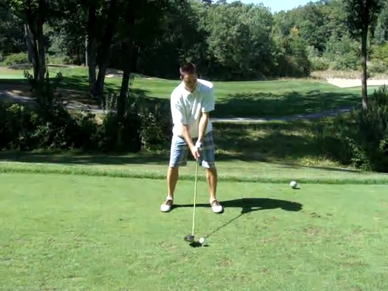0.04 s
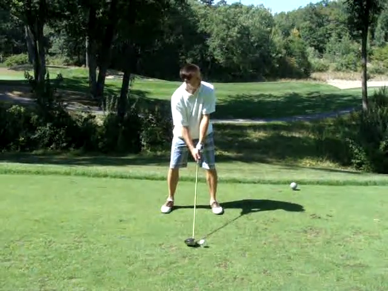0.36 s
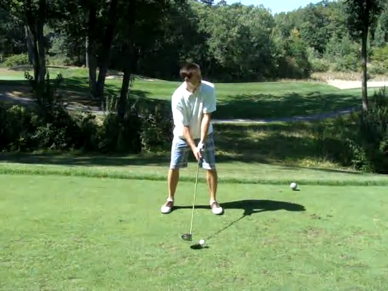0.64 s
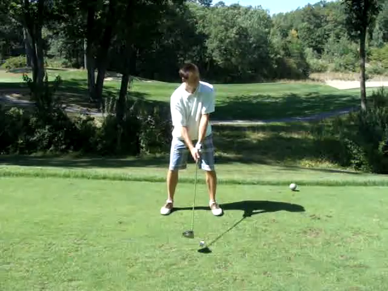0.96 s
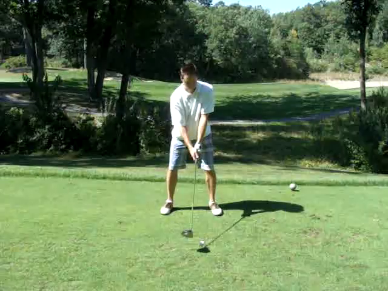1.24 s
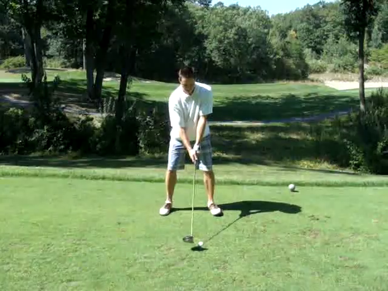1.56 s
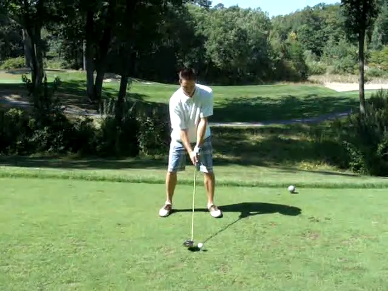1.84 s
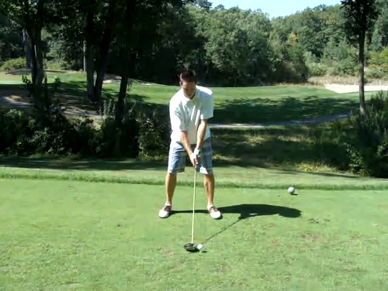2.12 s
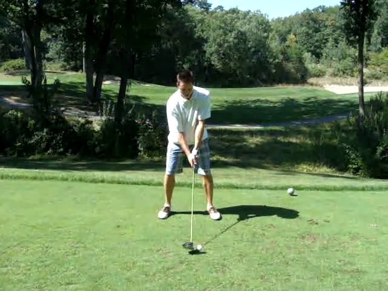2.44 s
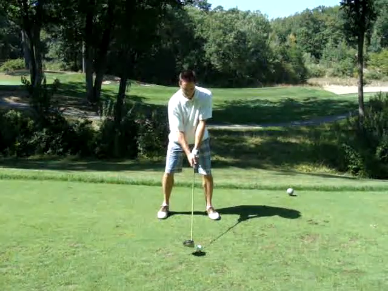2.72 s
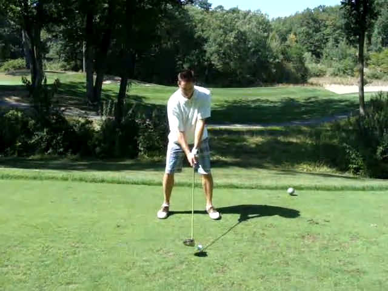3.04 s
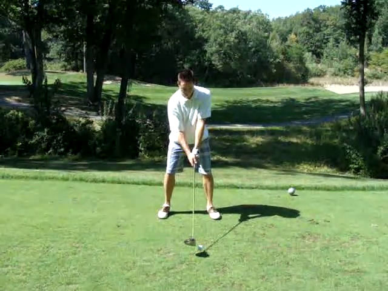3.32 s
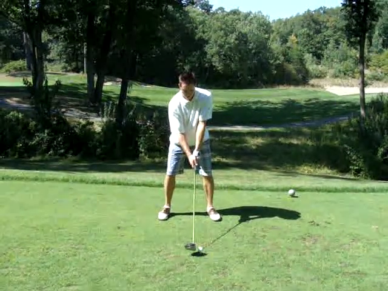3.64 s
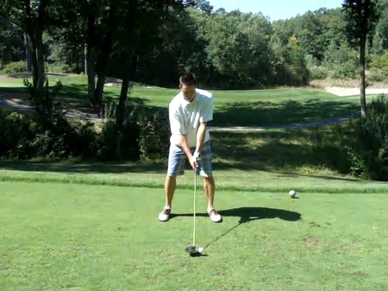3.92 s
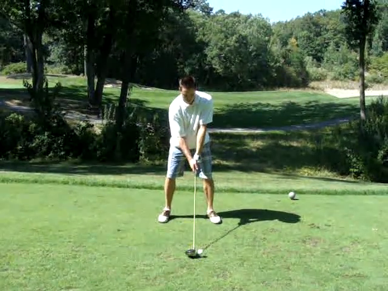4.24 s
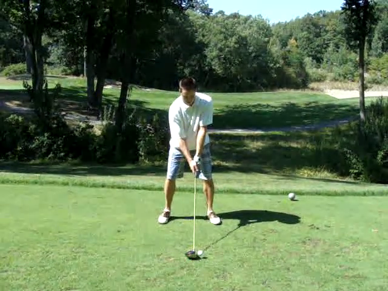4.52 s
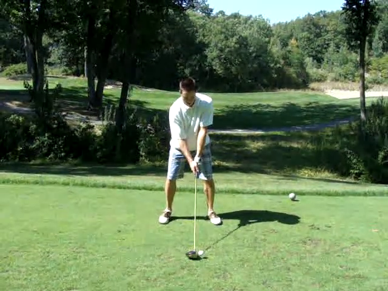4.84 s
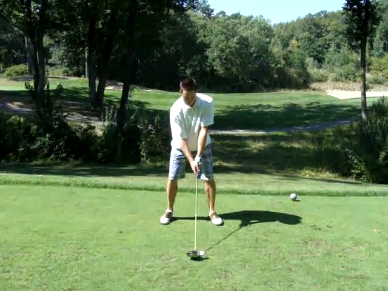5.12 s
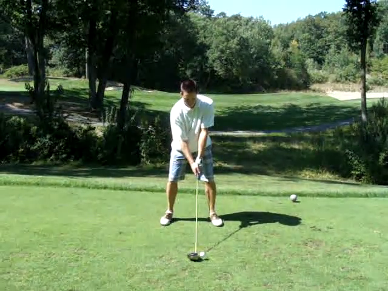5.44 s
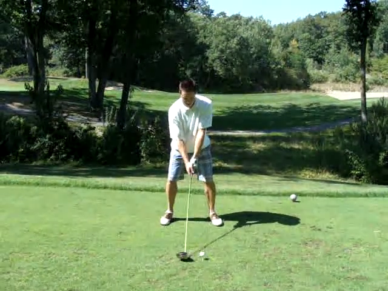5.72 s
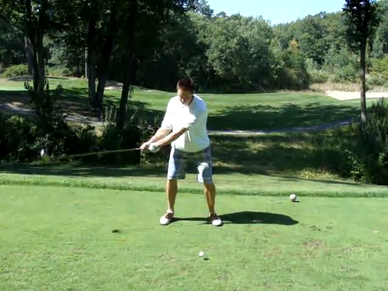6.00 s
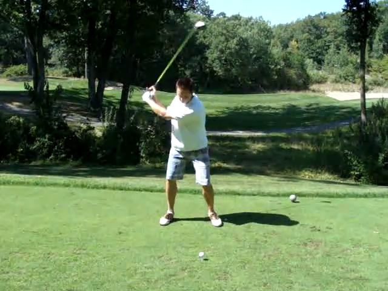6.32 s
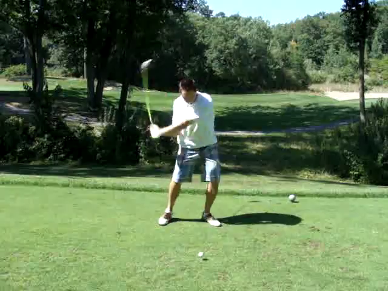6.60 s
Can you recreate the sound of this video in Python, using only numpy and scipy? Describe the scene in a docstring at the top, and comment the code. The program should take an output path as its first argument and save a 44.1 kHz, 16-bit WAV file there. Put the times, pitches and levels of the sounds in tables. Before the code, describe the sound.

A golf tee faces a wall of trees, heard from a few metres in front of the player. For several seconds there is only a quiet background of high, pulsing insects, leaf hiss, distant traffic and the odd bird peep. A tiny tick precedes a quick swish and the hard crack of a metal club head on the ball. Its ring dips in pitch and echoes back higher and blurred, leaving the insects again.

```python
"""On a still day, katydids rasp over far wind and traffic, leaves hiss and distant birds peep.
Near 5.9 s a faint tick comes as a golfer starts the backswing. Then the club's shaft whistles down
through the air. At 6.76 s the hollow metal head cracks on the ball, and the microphone's limiter
flattens the blow. The head rings, its pitch sinking as it swings away, and a wall of trees
facing the tee sends the ring back higher and smeared."""
import sys
import numpy as np
from scipy import signal
from scipy.fft import rfft, irfft, next_fast_len
from scipy.io import wavfile

SR = 44100
rng = np.random.default_rng(int(sys.argv[2]) if len(sys.argv) > 2 else 0)


def store_wav(level_fs):
    """Save 16-bit WAV to argv[1]."""
    pcm = np.round(np.clip(np.atleast_2d(level_fs), -1, 1) * 32767)
    wavfile.write(sys.argv[1], SR, pcm.T.astype(np.int16))


N = 337806
TIME = np.arange(N) / SR
FFT_SIZE = next_fast_len(N)
FREQS = np.maximum(np.arange(FFT_SIZE // 2 + 1) * SR / FFT_SIZE, 1)
IMPACT_S = 6.7601


def from_db(db):
    """Turn decibels into a gain to multiply by."""
    return 10 ** (np.asarray(db) / 20)


def unit_power(x):
    """Scale a signal so that its average power is 1."""
    return x / np.sqrt(np.mean(x ** 2) + 1e-20)


def colour(points):
    """A gain for every frequency, drawn through (f/Hz, level/dB) points."""
    hz, db = np.transpose(points)
    return from_db(np.interp(np.log(FREQS), np.log(hz), db))


def hump(hz, width_hz):
    """A gain that peaks at one frequency and falls away on both sides."""
    return 1 / (1 + ((FREQS - hz) / (.78 * width_hz)) ** 2)


def noise(gain):
    """Noise of power 1, shaped by a gain for each frequency; a hump at 0 Hz gives a random wobble."""
    return unit_power(irfft(rfft(rng.standard_normal(FFT_SIZE)) * gain, FFT_SIZE)[:N])


def band(x, low_hz, high_hz, order=2):
    """Let through what lies between two frequencies."""
    return signal.sosfilt(signal.butter(order, [low_hz, high_hz], "band", fs=SR, output="sos"), x + 1e-18)


def dying(start, t60):
    """A gain that jumps to 1, then fades by 60 dB every t60 seconds."""
    return (TIME >= start) * from_db(-60 * np.clip((TIME - start) / t60, 0, 4))


# the tone of the open air, from bass to treble: f/Hz, relative level/dB
AIR_TONE = [(20, -10), (45, -5.5), (70, 1.5), (160, 2), (260, -1), (700, -1), (1100, -7), (2200, -10),
            (4000, -13), (5000, -12.5), (5700, -17.5), (7000, -20.5), (8300, -14), (10000, -37)]
def open_air(murmur_db=-47, growth_db_per_s=0.29, waver_db=.5, leaves_db=-49):
    """Far wind and traffic make a low murmur that slowly grows; above it the leaves hiss evenly."""
    low_share = 1 / (1 + (FREQS / 1200) ** 8)
    level_db = murmur_db + growth_db_per_s * TIME + waver_db * noise(hump(0, 6.2))
    murmur = from_db(level_db) * noise(colour(AIR_TONE) * np.sqrt(low_share))
    hiss = from_db(leaves_db) * noise(colour(AIR_TONE) * np.sqrt(1 - low_share))
    return murmur + hiss


# hums in the distance: f/Hz, width/Hz, level/dB
FAR_HUMS = [(184.7, 9.8, -59), (509.4, 9.4, -63), (693, 62, -61), (1590, 53, -61.5), (1860, 38, -64.5)]
def hums():
    """Each far hum is a band of noise so narrow that it sounds like a wavering note."""
    return sum(from_db(db) * noise(hump(hz, width_hz)) for hz, width_hz, db in FAR_HUMS)


# one katydid a row: f/Hz, width/Hz, wing strokes/(1/s), relative level/dB
SINGERS = [(7725, 370, 16.4, -53.5), (8340, 1000, 20, -55), (8400, 190, 16, -53.5), (8825, 220, 16, -58)]
# how the whole chorus swells and sinks around its average: t/s, relative level/dB
CHORUS_SWELL = [(0.0, -50.5), (2.32, -50), (3.79, -52.5), (4.69, -51), (5.33, -51), (6.6, -50.5)]
def katydids(unsteady=0.1395, uneven=0.63, throb_db=4, chorus_db=-2):
    """Each wing stroke is a pulse of narrow rasping noise, no two equally strong."""
    swell_db = np.interp(TIME, *np.transpose(CHORUS_SWELL))
    chorus = np.zeros(N)
    for hz, width_hz, rate, db in SINGERS:
        stroke_rate = rate * (1 + unsteady * noise(hump(0, 1.83)))
        stroke = np.sin(2 * np.pi * np.cumsum(stroke_rate) / SR)
        depth_db = throb_db * (1 + uneven * noise(hump(0, 11)))
        chorus += from_db(db) * unit_power(noise(hump(hz, width_hz)) * from_db(depth_db * stroke))
    return from_db(chorus_db + swell_db - swell_db.mean()) * chorus


# distant bird calls: middle t/s, f/Hz, level/dB, half length/s
BIRD_PEEPS = [(0.322, 2480, -47, 0.012), (.39, 2500, -54, 0.034), (1.347, 2480, -54, 0.017),
              (2.082, 2420, -49, 0.012), (2.39, 1620, -56, .025), (4.902, 1600, -53, .03),
              (5.288, 5740, -58.5, .04)]
def birds(blur_hz=90):
    """Short peeps, blurred by the woods."""
    return sum(from_db(db) * np.exp(-((TIME - s) / half_length) ** 2) * noise(hump(hz, blur_hz))
               for s, hz, db, half_length in BIRD_PEEPS)


# a faint tick as the backswing starts: t/s, f/Hz, level/dB, time to fade 60 dB/s
BACKSWING_TICK = [(5.878, 4000, -35, 0.014)]
def tick(cycles=30):
    """A small sound nearby: the shorter it is, the wider its spread of pitch."""
    return sum(from_db(db) * dying(s, t60) * noise(hump(hz, cycles / t60))
               for s, hz, db, t60 in BACKSWING_TICK)


def scatter(delay, tree_line_s=0.12):
    """How strong the small echoes are at each delay: first turf, then the tree line, then deep woods."""
    beyond = delay - tree_line_s
    # each part is a level in dB, less a slope in dB per second
    turf = from_db(-18.5 - 19 * delay)
    tree_line = from_db(-3 - np.maximum(-125 * beyond, 242 * beyond))
    woods = from_db(-11 - 38.5 * beyond) * (beyond > 0)
    return np.sqrt(turf ** 2 + tree_line ** 2 + woods ** 2)


# echoes off single trunks: delay t/s, relative level/dB
TRUNK_ECHOES = [(.0848, -18.5), (.13, -26), (.1405, -28), (.181, -24)]
# how well the leaves send back each pitch: f/Hz, level/dB
LEAF_TONE = [(100, -14), (300, -13), (650, -6.5), (2000, 2.5), (2800, 0.5), (3600, -3), (4400, 2),
             (4900, -1), (5800, -4), (6500, 2.5), (7200, -3.5), (8500, -7.5), (10000, -10.5)]
def trees(sound, with_trunks=False, earliest_s=0, treble_loss_db=68, dull_hz=2100):
    """Countless small echoes smear a sound; the longer the path, the more treble the air takes."""
    delay = TIME[:SR]
    echo = scatter(delay) * rng.standard_normal(SR) / np.sqrt(SR) * (delay >= earliest_s)
    if with_trunks:
        for s, db in TRUNK_ECHOES:
            echo[int(s * SR)] += from_db(db)
    dull = signal.sosfilt(signal.butter(2, dull_hz, fs=SR, output="sos"), echo)
    bright_share = from_db(-treble_loss_db * delay ** 2)
    echo = bright_share * echo + (1 - bright_share) * dull
    returned = signal.fftconvolve(sound, echo)[:N]
    return irfft(rfft(returned, FFT_SIZE) * colour(LEAF_TONE), FFT_SIZE)[:N]


def swoosh(fastest_s=6.732, top_hz=969.3, onset_hz=520, waver=0.0855, flutter_db=3.5):
    """Swirls of air peel off the shaft and whistle higher with speed; the head drags rushing air along."""
    # in octaves below top speed: the club speeds up, holds, loses some speed to the ball, then slows
    downswing = 17.5 * np.maximum(fastest_s - TIME, 0)
    follow_through = (TIME > IMPACT_S) * (.42 + 8.2 * (TIME - IMPACT_S))
    octaves = -np.minimum(downswing + follow_through, 10)
    pitch = top_hz * 2 ** octaves
    whistle_db, rush_db = -11.5 + 25 * octaves, -21.5 + 48 * octaves
    swirling = 1 / (1 + (onset_hz / pitch) ** 20)  # a slow shaft hardly makes regular swirls
    whistle = 0
    # near full speed the shaft's slower middle adds a lower note, growing with the rush
    for share, db in [(1, whistle_db), (.72, rush_db + 6.5)]:
        phase = 2 * np.pi * np.cumsum(share * pitch * (1 + waver * noise(hump(0, 250)))) / SR
        whistle += np.sin(phase) * from_db(db + flutter_db * noise(hump(0, 170)))
    rush = noise(colour([(40, -35), (150, 12.5), (350, 4.5), (800, 10), (1400, 10), (2800, 8.5),
                         (4200, -8), (6000, -3.5), (9500, -23)]))
    return swirling * whistle + from_db(rush_db) * rush


def thud(bump_db=-18, bump_t60=0.19, knock_db=-4, knock_t60=0.029):
    """The ball's short low knock, and a deep bump under the blow."""
    knock = from_db(knock_db) * dying(IMPACT_S, knock_t60) * noise(hump(164, 109))
    bump = from_db(bump_db) * dying(IMPACT_S, bump_t60) * noise(hump(40, 22))
    return knock + bump


def crack(snap_db=33, burst_db=6, burst_t60=0.013):
    """The head meets the ball: one spike of pressure and a burst of shaking that dies fast."""
    spike = np.zeros(N)
    spike[int(IMPACT_S * SR)] = -from_db(snap_db)
    burst = from_db(burst_db) * dying(IMPACT_S, burst_t60) * rng.standard_normal(N)
    return band(band(spike + burst, 350, 6500, order=1), 110, 8900)


# the club head's ringing notes: f/Hz, relative level/dB, time to fade 60 dB/s, share of the pitch bend
HEAD_NOTES = [(2120, -21, 0.68, .1), (3556, 1.5, 0.16, 0.94), (3615, -4.5, 0.26, 0.92),
              (4035, 1.5, 0.15, 0.99), (4100, -14, 0.23, 0.81), (5760, -9, 0.1, 1), (5850, 3.5, 0.17, 0.54),
              (6136, 1, 0.22, 0.92), (6200, -3, 0.22, 0.68), (8220, -15, 0.25, 0.7),
              (8536, -3.5, 0.22, 0.37), (9030, -11, 0.26, 0.93)]
def head_ring(rise, bend, rough=0.33, deepest_s=.05, wash_db=-13, wash_t60=0.46):
    """The hollow head rings; its motion shifts the pitch by `rise` and curves it by `bend` (Doppler)."""
    start = int(IMPACT_S * SR)
    age = TIME[:N - start]
    bend_shape = .075 * age / deepest_s * np.exp(1 - age / deepest_s)
    lead_s = np.cumsum(bend_shape) / SR
    smooth = signal.butter(1, 250, fs=SR, output="sos")
    # a wash of weak, crowded notes lies under the strong ones
    wash = noise(colour([(1000, -29), (2500, -19), (3300, 1), (4600, -4), (6200, -3), (7200, -4),
                         (8400, 15), (10000, 8)]))
    ring = from_db(wash_db) * dying(IMPACT_S, wash_t60) * wash
    for hz, db, t60, share in HEAD_NOTES:
        # the turning head and its echo off the turf make each note flicker
        wobble = unit_power(signal.sosfilt(smooth, rng.standard_normal((2, len(age)))))
        flicker = 1 + rough * (wobble[0] + 1j * wobble[1])
        cycles = hz * (age * (1 + rise) + bend * share * lead_s)
        ring[start:] += from_db(db - 60 * age / t60) * np.imag(flicker * np.exp(2j * np.pi * cycles))
    return ring


def golf_shot(head_db=13.5, facing_s=0.062, crack_echo_db=2, swoosh_echo_db=-5, ring_echo_db=-6):
    """The head curves away from the microphone but runs at the far trees, so their echo is higher."""
    # the head faces the microphone, then turns away and quickly loses 20 dB
    facing_db = head_db - np.clip(700 * (TIME - IMPACT_S - facing_s), 0, 20)
    air, blow = swoosh(), crack()
    direct = air + blow + thud() + from_db(facing_db) * head_ring(rise=0, bend=-1.1)
    echoes = trees(from_db(crack_echo_db) * blow + from_db(swoosh_echo_db) * air, with_trunks=True)
    # seven echo paths fan out from the turf beside the tee to the trees ahead
    beside, ahead = (-.04, -0.507, .01), (.09, 0.257, 0.088)
    for rise, bend, earliest_s in np.linspace(beside, ahead, 7):
        echoes += from_db(ring_echo_db) * trees(head_ring(rise, bend, rough=0.75), earliest_s=earliest_s)
    return direct + echoes


def scene():
    """One microphone a few metres in front of the golfer."""
    return (golf_shot() + katydids() + birds() + open_air() + hums() + tick())[None]


def record(dry, limit_db=-4.5, release_db_per_s=260, attack_s=0.0016, ceiling=0.65, cutoff_hz=10000):
    """A fast limiter turns the blow down, what slips past it overloads, and the top treble is cut."""
    power = signal.lfilter([1], [1, -np.exp(-1 / (0.01 * SR))], dry ** 2) / (0.0059 * SR)
    # the limiter follows each peak up, then lets go at a steady rate
    fall_db = release_db_per_s * TIME
    held_db = np.maximum.accumulate(10 * np.log10(power + 1e-12) + fall_db, axis=-1) - fall_db
    lag = np.exp(-1 / (attack_s * SR))
    cut_db = signal.lfilter([1 - lag], [1, -lag], np.maximum(held_db - limit_db, 0))
    limited = dry * from_db(-cut_db) / ceiling
    clipped = ceiling * limited / (1 + limited ** 6) ** (1 / 6)
    return signal.sosfilt(signal.ellip(12, .2, 100, cutoff_hz, fs=SR, output="sos"), clipped)


dry = scene()
out = record(dry)
store_wav(out)
```